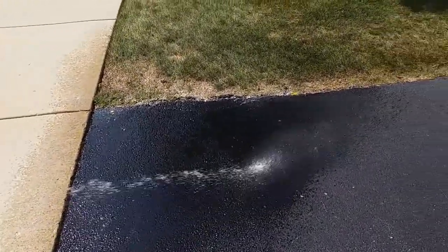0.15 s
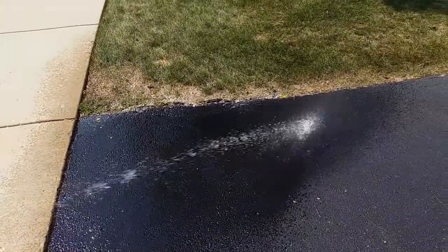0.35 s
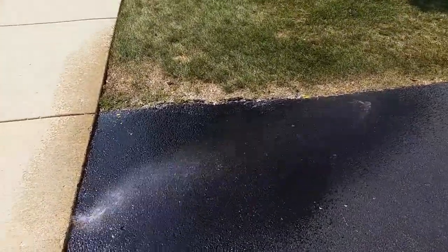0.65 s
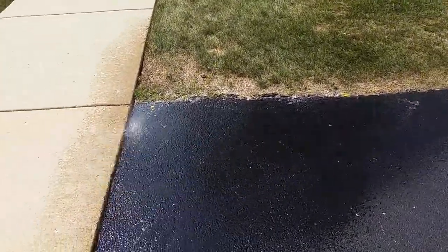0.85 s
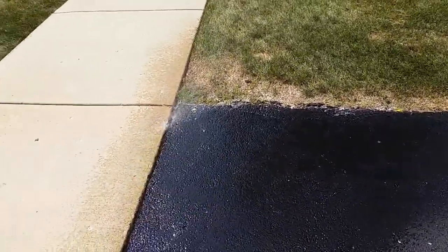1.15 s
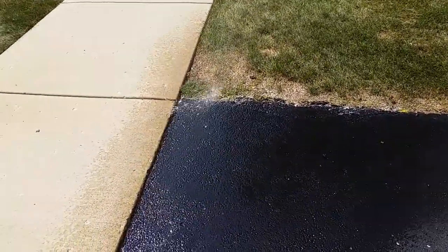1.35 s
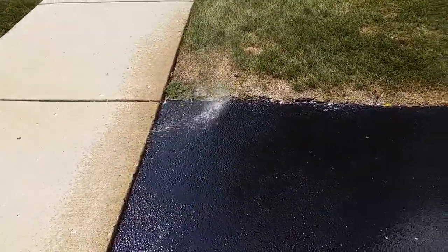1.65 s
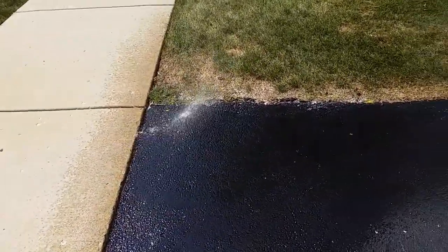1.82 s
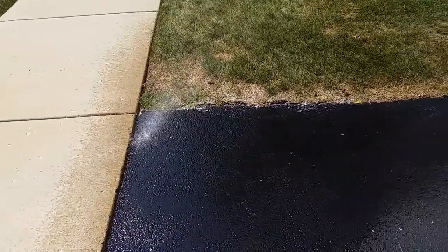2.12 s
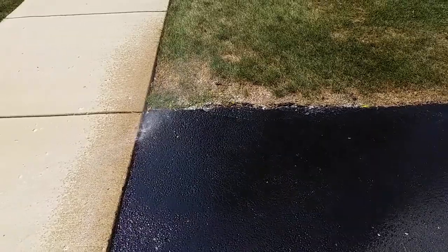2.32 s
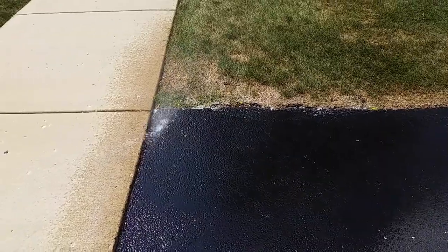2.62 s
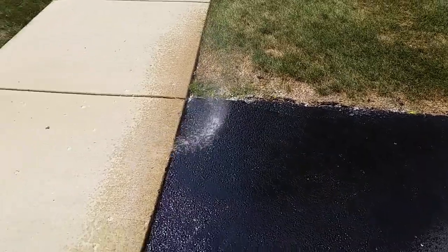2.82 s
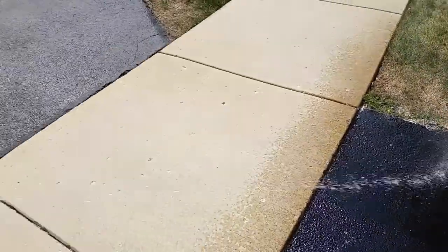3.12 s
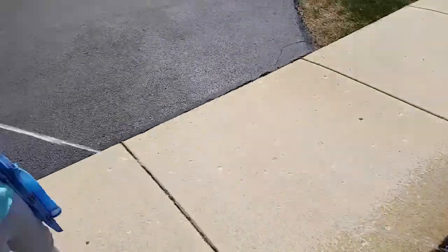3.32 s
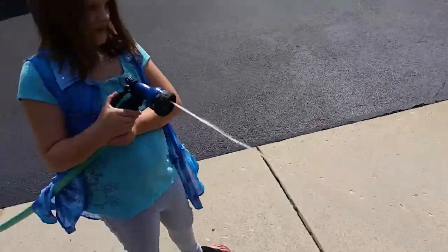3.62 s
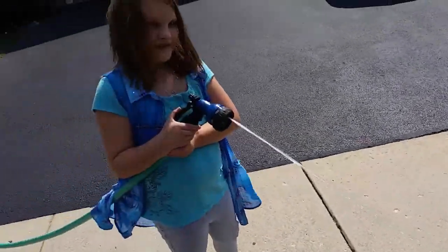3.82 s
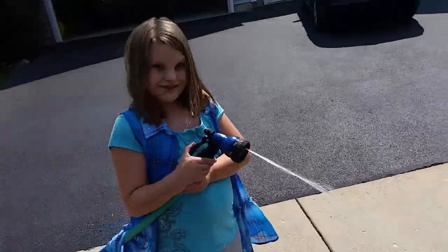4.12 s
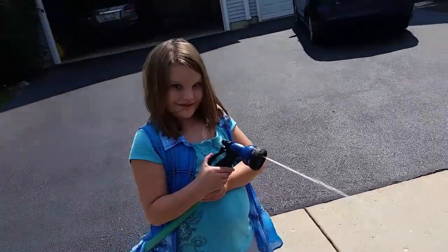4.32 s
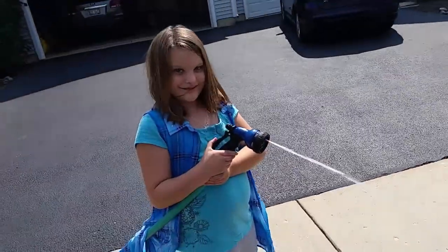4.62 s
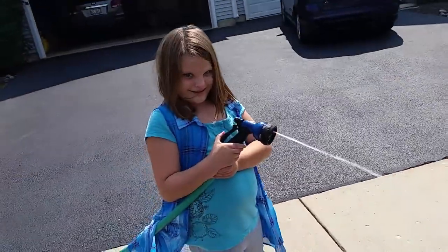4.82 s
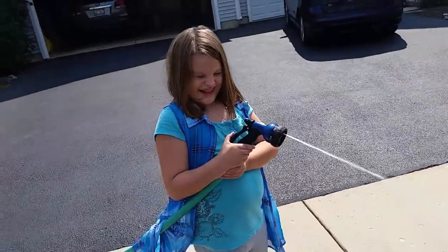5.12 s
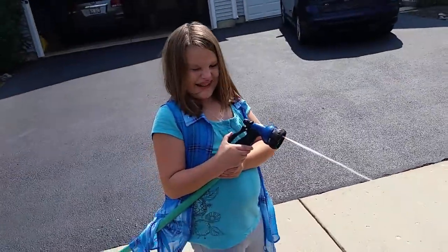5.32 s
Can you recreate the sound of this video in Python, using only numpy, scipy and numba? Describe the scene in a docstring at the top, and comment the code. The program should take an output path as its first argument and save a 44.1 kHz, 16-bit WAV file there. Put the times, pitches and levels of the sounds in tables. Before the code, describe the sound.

A garden hose jet hisses and spatters steadily on a wet asphalt driveway while wind thumps and rumbles against the microphone.

```python
"""Garden hose on an asphalt driveway

A nozzle throws a thin jet onto the ground a few metres from two hand-held microphone ports that turn towards it.
The water is random impacts plus noise, split by pitch into splashes, patter and a sizzling mist; noise through
a resonance sings in the nozzle, and short bursts of hiss are its spits. Filtered noise and single pressure pulses
are the wind, which buffets each port by itself; faint coloured noise is the distant neighbourhood."""
import sys
import numpy as np
from scipy import signal
from scipy.fft import rfft, irfft
from scipy.io import wavfile
from scipy.ndimage import uniform_filter1d
from numba import njit

SR = 44100
rng = np.random.default_rng(int(sys.argv[2]) if len(sys.argv) > 2 else 0)


def transcribe(u):
    """Save the signal u as a 16-bit wav file named by the first command-line argument.

    u: samples, shape (n,) or (channels, n), limited to [-1, 1]; the rate is SR.
    q: integer samples, one column per channel.
    """
    v = np.clip(np.atleast_2d(u).T, -1, 1)
    q = np.round(v * 32767).astype(np.int16)
    wavfile.write(sys.argv[1], SR, q)


N = 240389
T = np.arange(N) / SR  # s

# ringing in the joint at the pavement's edge while the jet plays on it: [t/s, prominence/dB]
EDGE_RING = [(0, -25), (.7, -7), (1.0, -4), (1.35, -0.5), (1.5, -14), (2.35, -7), (2.55, 6.5), (2.8, -3),
             (3.0, -18), (5.45, -16)]


def undb(db):
    """Level definition: decibels to an amplitude ratio."""
    return 10 ** (np.asarray(db) / 20)


def curves(table):
    """Linear interpolation in time: the columns after the first, one value a sample."""
    s, *columns = np.transpose(table)
    return [np.interp(T, s, column) for column in columns]


def unit(x):
    """Normalization: each channel at rms 1."""
    return x / np.sqrt(np.mean(x ** 2, axis=-1, keepdims=True))


def even(x, size):
    """Running normalization: hold the rms at 1 over stretches of size samples."""
    return x / np.sqrt(uniform_filter1d(x ** 2, size=size))


def place(db, pan_db):
    """Power addition: gains for two unrelated channels whose mean has the level db; pan is left minus right."""
    pair = undb(np.array([pan_db, -pan_db]).reshape(2, -1) / 2)
    power = np.sum(pair ** 2, axis=0)
    return 2 * undb(db) * pair / np.sqrt(power)


def walk(rate):
    """Slow random modulation: normal values held for 1 / rate s, then smoothed twice; rms near 1."""
    hold = max(int(SR / rate), 1)
    steps = np.repeat(rng.standard_normal(N // hold + 1), hold)
    smooth = uniform_filter1d(uniform_filter1d(steps, hold), hold)
    return unit(smooth)[:N]


def puff(s, length):
    """Gaussian envelope: a brief swell centred on time s, with standard deviation length / 2."""
    return np.exp(-2 * ((T - s) / length) ** 2)


def colour(x, hz, db):
    """Spectral shaping: a gain for each frequency, in dB linear over log frequency."""
    f = np.maximum(np.arange(N // 2 + 1) * SR / N, 1)
    gain_db = np.interp(np.log(f), np.log(hz), db)
    return irfft(rfft(x) * undb(gain_db), N)


def cut(x, hz, kind, order):
    """Butterworth filter: a maximally flat pass band."""
    sos = signal.butter(order, np.minimum(hz, SR / 2 - 1), kind, fs=SR, output="sos")
    return signal.sosfilt(sos, x)


@njit
def svf(x, hz, damping):
    """Damped second-order resonator with a moving centre: low-pass and band-pass of peak gain 1."""
    low, band = np.empty(len(x)), np.empty(len(x))
    b, l = 0., 0.  # integrator states
    for i in range(len(x)):
        g = np.tan(np.pi * min(hz[i], .45 * SR) / SR)
        v = (b + g * (x[i] - l)) / (1 + g * (g + damping))
        low[i], band[i] = l + g * v, damping * v
        b, l = 2 * v - b, l + 2 * g * v
    return low, band


def direct(x, share):
    """Arrival-time difference: the left port also hears a share of the right one's sound, shifted in time."""
    # bearing of the water: [t/s, lead of the right port/ms]
    bearing = [(0, -0.52), (1.2, -0.16), (2.6, -0.097), (3.5, .36), (5.45, 0.46)]
    lead_ms, = curves(bearing)
    index = np.rint((T - lead_ms / 1000) * SR).astype(int)
    shifted = x[1, np.clip(index, 0, N - 1)]
    return np.array([x[0] + share * shifted, x[1]])


def yard(shared=0.84):
    """Partial coherence: far-off neighbourhood noise, partly alike at the two ports."""
    # relative spectrum of the distant hum: [f/Hz, density/dB per Hz]
    hum_spectrum = [(20, -10), (60, 16.5), (140, -19), (250, 5), (370, 3.5), (600, 0), (800, -1.5),
                    (1500, -4.5), (2500, -6), (9000, -13.5)]
    # level of the distant hum as heard, lower for a while during the strong wind: [t/s, mean level/dB]
    hum_level = [(0, -46.5), (1.45, -49.5), (2.2, -51.5), (2.45, -48), (3.4, -46), (3.8, -47.5), (4.2, -48),
                 (5.45, -49.5)]
    level_db, = curves(hum_level)
    drift_db = .5 * walk(1.1)
    air = rng.standard_normal((2, N)) + shared * rng.standard_normal(N)
    return unit(colour(air, *np.transpose(hum_spectrum))) * undb(level_db + drift_db)


def pressure(sway_db=1.73, sway_rate=13):
    """Addition of powers: wind pressure at each port in dB, gusts on top of a wandering breeze."""
    # breeze that builds, then dies away as the ports turn out of it: [t/s, mean level/dB]
    breeze_level = [(0, -28.5), (.65, -26.5), (.85, -23.5), (1.3, -19.5), (1.55, -22), (1.65, -30),
                    (1.95, -25), (2.3, -25.5), (2.6, -43.5), (2.95, -41.5), (4.05, -52.5), (4.5, -43),
                    (5.45, -54)]
    # gusts that ride on it: [t/s, peak level/dB, length/s, left minus right/dB]
    gust_list = [(0.056, -24.5, 0.053, 5), (0.14, -30, 0.15, 9), (0.34, -27.5, .07, -6),
                 (0.613, -29.5, 0.089, 12), (0.77, -23, 0.076, 2), (0.92, -23.5, 0.15, 16),
                 (1.127, -24.5, 0.17, -7), (1.383, -22, 0.067, 4), (1.535, -17.5, 0.054, 2),
                 (1.784, -23.5, 0.047, 6.5), (1.869, -24, 0.088, -7), (2.06, -25, 0.06, 3),
                 (2.238, -30, 0.055, -4), (2.397, -34, .06, 20), (2.485, -35.5, 0.055, -8),
                 (2.627, -32, 0.055, -10), (2.721, -35.5, 0.081, 1), (2.878, -41, 0.11, -20),
                 (3.153, -41.5, 0.046, -18), (3.28, -38, 0.089, 21), (3.536, -38.5, 0.11, 8),
                 (3.69, -42, 0.073, 3), (3.863, -39.5, 0.17, 27), (4.233, -40, 0.082, -14),
                 (4.375, -39, 0.065, -12), (4.603, -39.5, 0.057, 18), (4.704, -27.5, 0.079, -15),
                 (4.82, -35, 0.2, -15), (4.922, -41, .04, 8), (5.011, -33, 0.078, -21),
                 (5.183, -45, 0.053, 12)]
    sway = sway_db * np.array([walk(sway_rate), walk(sway_rate)])
    breeze = undb(curves(breeze_level)[0] + sway)
    gust_power = sum((place(db, pan_db) * puff(s, length)) ** 2 for s, db, length, pan_db in gust_list)
    return 10 * np.log10(breeze ** 2 + gust_power)


def wind(corner_hz=108, doubling_db=21, flutter_db=2.0, fine_ratio=1.62, rip_db=3.0, top_hz=750):
    """Turbulence unrelated at each port: a harder gust makes smaller eddies and so reaches higher."""
    # size of the largest eddies, as the lowest pitch of the rumble: [t/s, f/Hz]
    largest_eddy = [(0, 40.7), (2.8, 30.8), (3.8, 43.8), (4.5, 62), (5.45, 83)]
    low_hz, = curves(largest_eddy)
    out = []
    for gust_db in pressure():
        flutter = flutter_db * walk(55)
        # above -27 dB the reach doubles every doubling_db
        excess_db = np.maximum(gust_db + flutter + 27.0, 0)
        reach_hz = corner_hz * 2 ** (excess_db / doubling_db)
        air = rng.standard_normal(N)
        air = air - sum(svf(air, low_hz, np.sqrt(2)))  # little below the largest eddies
        swirl = svf(air, reach_hz, np.sqrt(2))[0]
        # the finest eddies come and go
        fine_hz = reach_hz * fine_ratio * undb(rip_db * walk(60))
        rumble = cut(svf(swirl, fine_hz, np.sqrt(2))[0], top_hz, "low", order=3)
        # the gust sets the pressure, whatever the size of its eddies
        out.append(even(rumble, size=SR // 20) * undb(gust_db + flutter))
    return np.array(out)


def rips(low_hz=215):
    """Fine turbulence: the hardest gusts tear across a port's rim as short bursts of band-limited noise."""
    # [t/s, level/dB, length/s, top f/Hz, port (0 left, 1 right)]
    rip_list = [(0.036, -25.5, 0.01, 600, 0), (0.377, -27.5, 0.0049, 600, 0), (0.813, -25.5, 0.012, 730, 1),
                (1.174, -27.5, 0.014, 850, 1), (1.315, -18, 0.012, 620, 1), (1.369, -20, 0.011, 1170, 1),
                (1.395, -25, 0.026, 680, 1), (1.531, -23.5, 0.0032, 1060, 1),
                (1.811, -27.5, 0.0068, 794, 0), (1.825, -28.5, 0.017, 706, 1)]
    out = np.zeros((2, N))
    for s, db, length, top_hz, port in rip_list:
        air = cut(rng.standard_normal(N), [low_hz, 2 * low_hz], "band", order=1)
        air = cut(air, top_hz, "low", order=6)
        out[int(port)] += unit(air) * undb(db) * puff(s, length)
    return out


def eddies(gain_db=-1):
    """Vortex pressure pulse: a small eddy crossing a port gives one peak between two troughs."""
    # [t/s, peak before gain_db/dB, width (1.25 standard deviations)/ms, port (0 left, 1 right)]
    eddy_list = [(0.039, -11.5, 1.16, 0), (0.377, -16, 3.5, 0), (0.812, -10, 3.6, 1), (0.863, -2.5, 1.7, 0),
                 (0.886, -7, 2.2, 0), (0.955, -22, 1.3, 0), (1.337, -6, 1.18, 0), (1.367, -13, 0.98, 1),
                 (1.402, -4, 2.9, 0), (1.414, 1.5, 3.2, 0), (1.429, -5, 0.96, 0), (1.477, 3, 4, 1),
                 (1.534, -10, 1.42, 0), (1.532, -13, 0.78, 1), (1.771, -5.5, 3, 0), (1.86, -7, 3.9, 1),
                 (2.064, -11, 2.1, 0), (2.148, -11.5, 1.7, 0), (3.28, -13, 3.3, 0), (3.515, -11, 2.02, 0),
                 (3.525, -10.5, 2.56, 0), (3.881, -24, 4, 0), (3.925, -33, 4.2, 0), (4.243, -16.5, 2.55, 1),
                 (4.251, -15.5, 1.87, 1), (4.274, -15.5, 3.1, 1), (4.7, -11.5, 1.67, 1),
                 (4.799, -12, 2.23, 1), (4.913, -10.5, 3.5, 1)]
    out = np.zeros((2, N))
    for s, db, width_ms, port in eddy_list:
        u = ((T - s) / (width_ms / 1000) * 1.25) ** 2
        pulse = (1 - u) * np.exp(-np.minimum(u, 60) / 2)
        out[int(port)] += undb(db + gain_db) * pulse
    return out


def nozzle(damping=.14):
    """Resonance excited by turbulence: rushing water sings faintly in the nozzle's bore."""
    # [t/s, resonance f/Hz, level/dB]
    bore = [(0, 1950, -63), (2.3, 1950, -64.5), (2.6, 1950, -61), (3.2, 1940, -61), (3.7, 1890, -58),
            (4.1, 1720, -57), (4.4, 2020, -58.5), (5.45, 2020, -59)]
    hz, level_db = curves(bore)
    rush = direct(rng.standard_normal((2, N)), share=0.46)
    sung = []
    for port in rush:
        once = svf(port, hz, damping)[1]
        sung.append(svf(once, hz, damping)[1])
    return unit(np.array(sung)) * undb(level_db)


def spits():
    """Band-limited noise bursts: brief spurts of water from the nozzle."""
    # [t/s, peak level/dB, length/s, centre f/Hz, width/Hz, left minus right/dB]
    spit_list = [(5.051, -38, 0.0064, 4950, 1400, 17), (5.2565, -37, .0045, 11500, 8500, -18),
                 (5.2556, -38, 0.005, 6700, 2000, 14), (5.262, -36.5, 0.0059, 5430, 3400, 14),
                 (5.265, -46, .010, 2000, 2400, 0), (5.371, -39, .004, 10800, 2500, -13),
                 (5.371, -43, .004, 7200, 900, 5), (5.375, -44, .008, 10500, 4000, -11)]
    out = np.zeros((2, N))
    for s, db, length, hz, width_hz, pan_db in spit_list:
        band_hz = [hz - width_hz / 2, hz + width_hz / 2]
        hiss = cut(rng.standard_normal((2, N)), band_hz, "band", order=2)
        out += unit(hiss) * place(db, pan_db) * puff(s, length)
    return out


def drops(rate, spread_db, blur):
    """Shot noise: impacts of random size, mostly tiny, over the even hiss of those too small to tell apart."""
    size = undb(spread_db * np.minimum(rng.exponential(size=(2, N)), 5))
    struck = rng.random((2, N)) < rate / SR  # rate in impacts per s
    clicks = struck * size * rng.standard_normal((2, N))
    return unit(clicks) + blur * rng.standard_normal((2, N))


def ground(x, share):
    """Comb interference: the hiss also arrives by way of the paving, a path that changes with the hand's sway."""
    lag_s = .0018 + .00008 * walk(1.5)
    reflected = np.array([np.interp(T - lag_s, T, port) for port in x])
    return x + share * reflected


def joint(x):
    """Modal resonance: narrow modes stand out while the jet plays on the concrete edge."""
    # [f/Hz, width/Hz, relative level/dB]
    edge_modes = [(5450, 460, -0.5), (6650, 550, 1)]
    prominence_db, = curves(EDGE_RING)
    ring = sum(undb(db) * svf(x, np.full(N, float(hz)), width / hz)[1] for hz, width, db in edge_modes)
    return x + undb(prominence_db) * ring


def water_level(swell_s=0.04, tremor_db=0.56, tremor_rate=13):
    """Addition of levels in dB: a slow course with brief dips, momentary swells and a constant small tremble."""
    # level of the water as heard, dipping briefly just after the hardest wind buffet: [t/s, reference level/dB]
    heard_level = [(0.0, -40), (0.17, -37.5), (0.33, -39), (0.76, -39), (0.79, -36.5), (1.02, -42),
                   (1.05, -39), (1.36, -38), (1.46, -46), (1.56, -39.5), (2.25, -44), (2.38, -37.5),
                   (3.17, -40.5), (3.2, -36), (3.22, -39), (4.08, -41.5), (5.36, -45.5), (5.45, -40)]
    # the hiss swells or dips for a moment: [t/s, change/dB]
    swell_list = [(0.42, -2.5), (0.8, 1.5), (0.88, -3), (1.0, 1), (1.1, 1), (1.72, -2.5), (1.78, 1.5),
                  (1.87, -2), (2.22, -0.5), (2.51, 4), (2.6, 1.5), (3.1, 0), (3.38, 1), (4.2, -3),
                  (4.35, 2), (5.0, 2.5)]
    swells_db = sum(db * puff(s, swell_s) for s, db in swell_list)
    return curves(heard_level)[0] + swells_db + tremor_db * walk(tremor_rate)


def spray(clump_db=1.07, surge_db=0.56, patter_hz=3300, mist_hz=8300):
    """Jet breakup into clumps of drops: dull splashes, sharp patter and a mist whose hiss shifts with the aim."""
    # colour of the spray at the ports: [f/Hz, left/dB, right/dB]
    port_colour = [(1000, -10.5, -8.5), (2000, -9, -5.5), (3220, -6.5, -9.5), (4260, -4.5, -10),
                   (5330, -8, -12.5), (6450, -6, -10.5), (7400, -5.5, -10), (8550, -11.5, -9),
                   (10120, -11, -2), (13400, -7.5, -0.5), (13350, -6, -0.5), (13900, -10, -0.5),
                   (15600, -7, -1.5)]
    # side on which the fine mist is heard: [t/s, left minus right/dB]
    mist_side = [(0.0, -9), (0.48, -7.5), (1.02, -2.5), (1.08, -6.5), (2.79, -3), (3.32, -12.5), (4.25, -5),
                 (4.96, -10.0), (5.45, -8)]
    # bright band of the mist, moving with the angle to the jet: [t/s, mean centre f/Hz, prominence/dB]
    bright_band = [(0, 10800, 8), (.65, 10900, 0), (.82, 9600, 8), (.93, 9900, 2), (1.0, 13500, -9),
                   (1.12, 14600, 4), (1.6, 15600, -14), (2.3, 13500, 4), (2.9, 14500, -10),
                   (3.15, 10900, 6), (3.38, 12700, 2), (3.7, 11100, -3), (5.2, 11800, -11),
                   (5.45, 10700, 1)]
    level_db = water_level()
    on_edge = undb(curves(EDGE_RING)[0])
    # the big splashes follow only a share of the level
    splash_db = -28 + .6 * level_db
    # the patter leans left, and grows and leans further while the jet plays on the edge
    patter_db = level_db - 5.5 + 1 * on_edge
    patter_pan_db = 2.5 + 3.8 * on_edge
    mist_db = level_db + 1.5
    mist_pan_db, = curves(mist_side)
    sizzle_hz, sizzle_db = curves(bright_band)

    clumps = undb(clump_db * walk(450) + surge_db * walk(45))
    impacts = drops(rate=6000, spread_db=2.5, blur=0.84) * clumps
    impacts = ground(direct(impacts, share=.22), share=.17)
    hz, *ports_db = np.transpose(port_colour)
    water = np.array([colour(x, hz, db) for x, db in zip(impacts, ports_db)])
    # the bigger drops slap into the puddle on their own
    slaps = 0.38 * drops(rate=3000, spread_db=1.0, blur=0.82)
    splash = cut(water + slaps, 670, "high", order=2)
    splash = cut(splash, patter_hz, "low", order=4)
    patter = cut(cut(water, patter_hz, "high", order=4), mist_hz, "low", order=8)
    mist = cut(water, mist_hz, "high", order=8)
    # the left port faces the pavement; the right one faces the jet and hears its broad, restless bright band
    patter[0] = joint(patter[0])
    restless_hz = sizzle_hz * (1 + .018 * walk(40))
    mist[1] += undb(sizzle_db) * svf(mist[1], restless_hz, .18)[1]

    splash_out = unit(splash) * place(splash_db, 0)
    patter_out = even(patter, size=SR // 5) * place(patter_db, patter_pan_db)
    mist_out = even(mist, size=SR // 5) * place(mist_db, mist_pan_db)
    return splash_out + patter_out + mist_out


def scene(overload=.7):
    """Superposition of all sources; soft saturation as the ports give way under the hardest buffets."""
    buffets = overload * np.tanh((wind() + eddies() + rips()) / overload)
    return yard() + buffets + nozzle() + spits() + spray()


def record(dry, top_hz=15870):
    """Finite bandwidth: a steep elliptic low-pass removes the highest treble."""
    return signal.sosfilt(signal.ellip(12, .2, 80, top_hz, fs=SR, output="sos"), dry)


dry = scene()
out = record(dry)
transcribe(out)
```